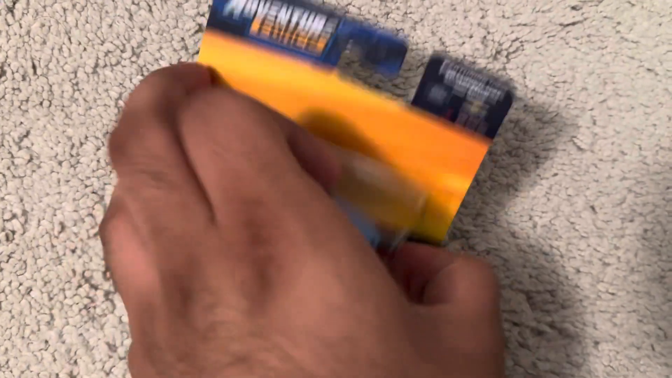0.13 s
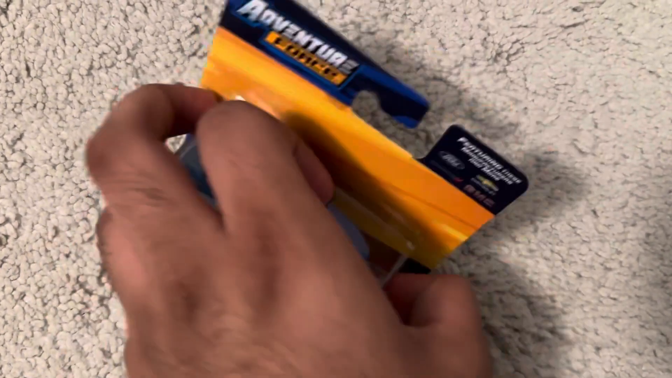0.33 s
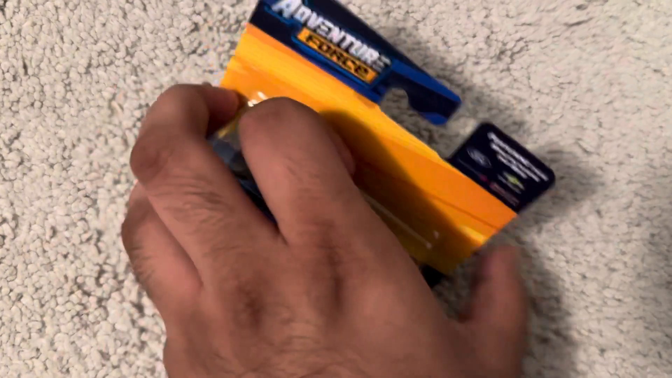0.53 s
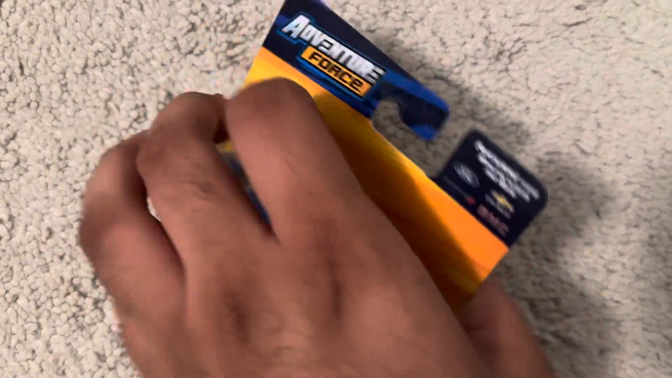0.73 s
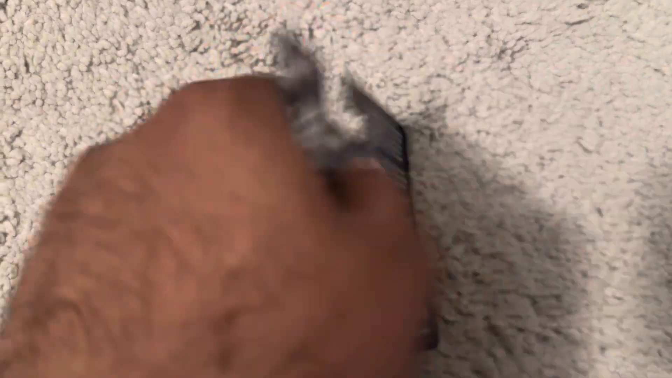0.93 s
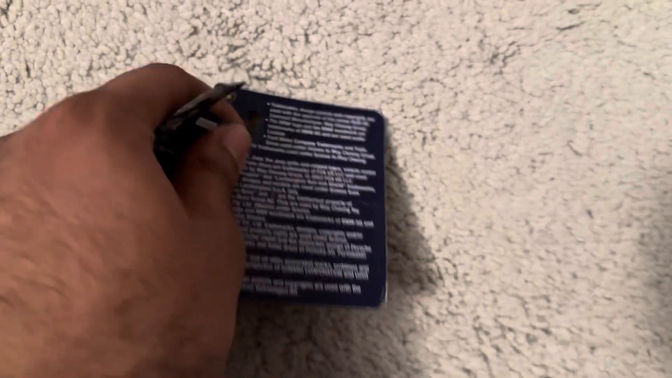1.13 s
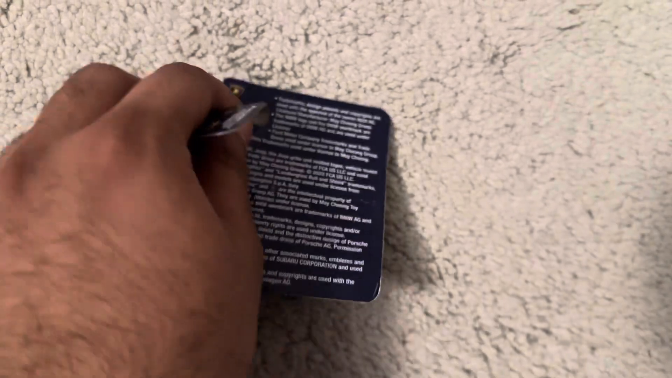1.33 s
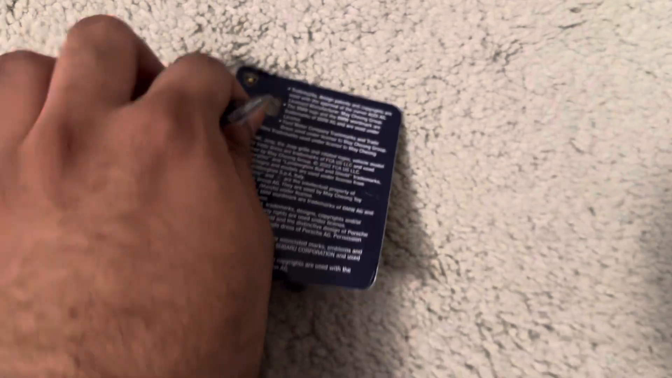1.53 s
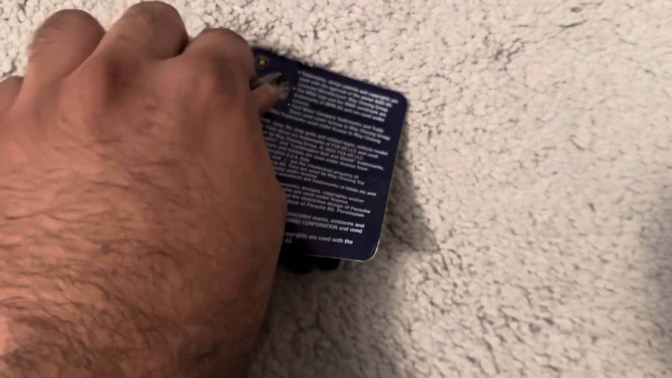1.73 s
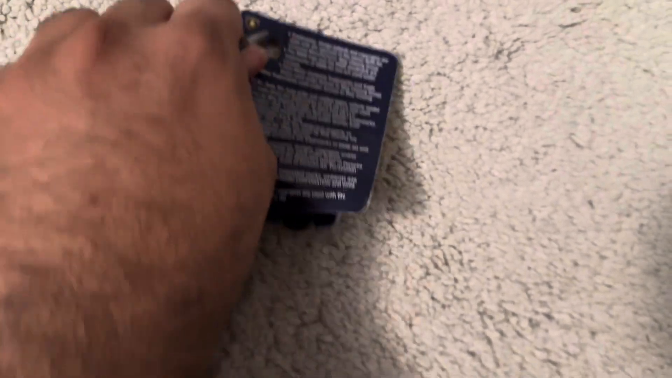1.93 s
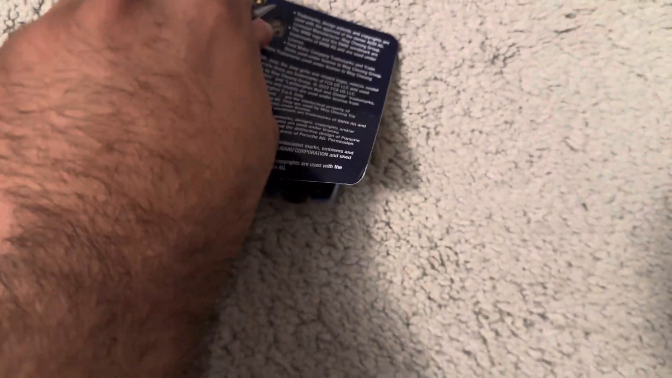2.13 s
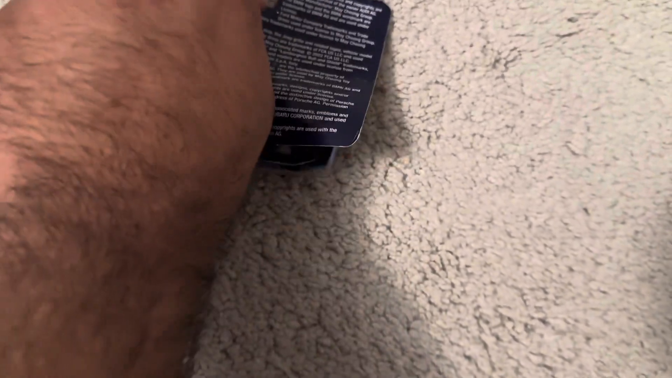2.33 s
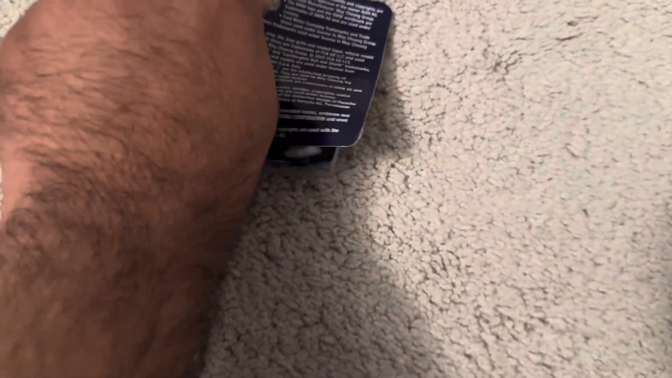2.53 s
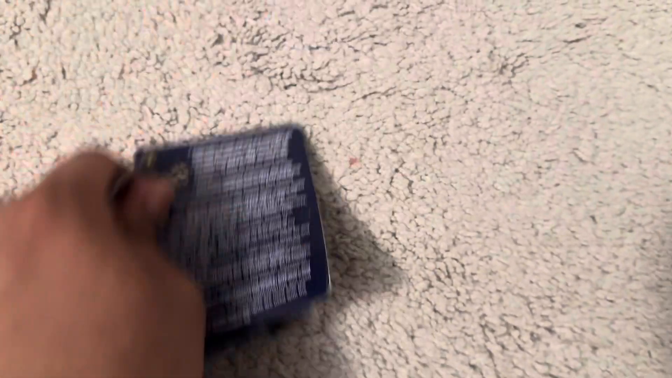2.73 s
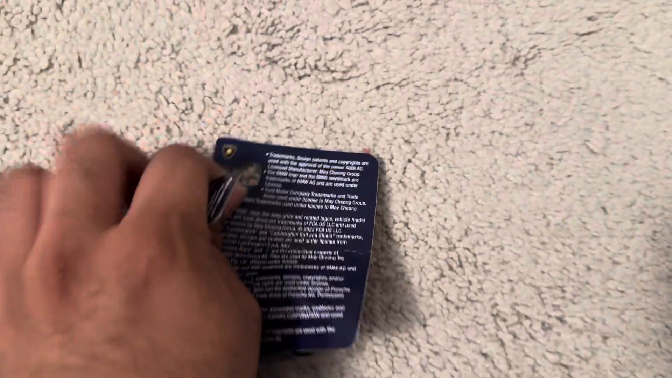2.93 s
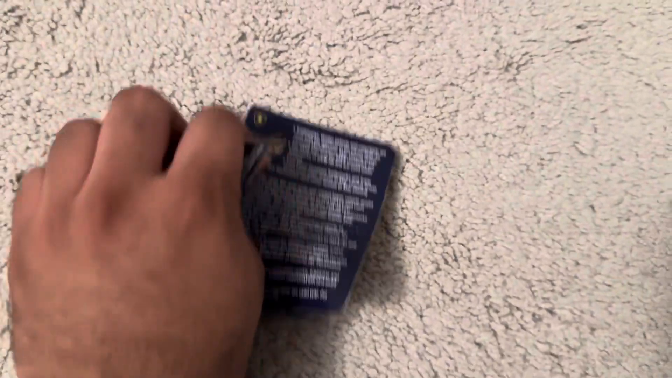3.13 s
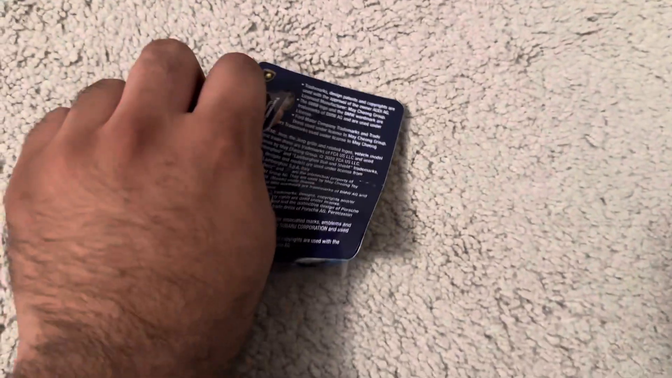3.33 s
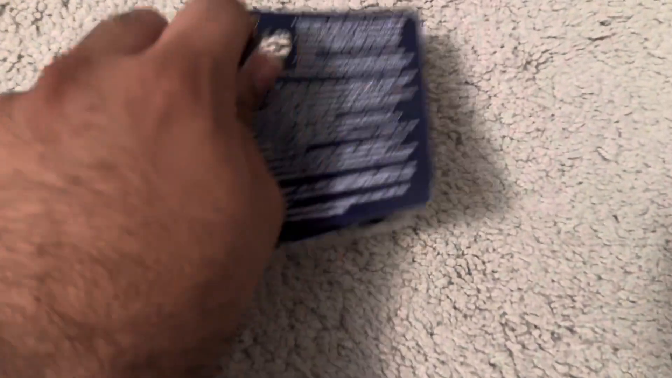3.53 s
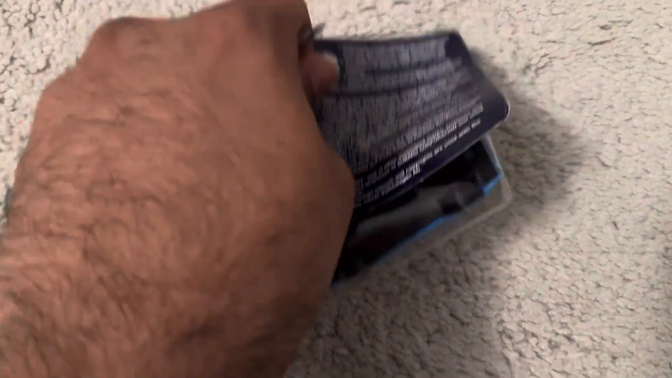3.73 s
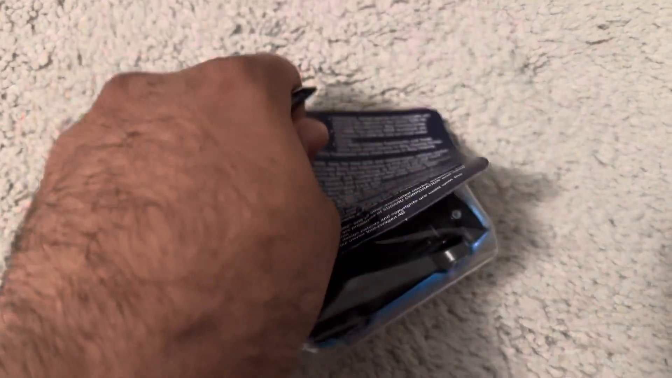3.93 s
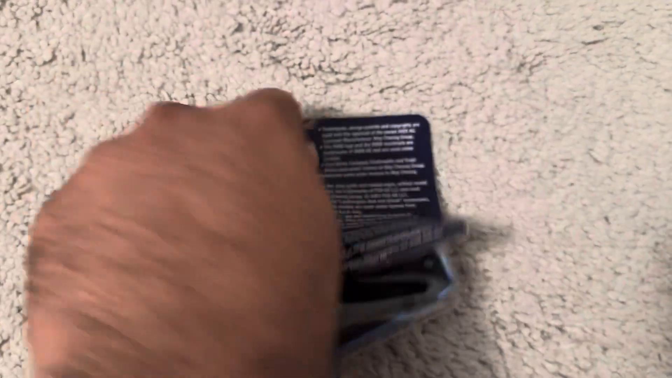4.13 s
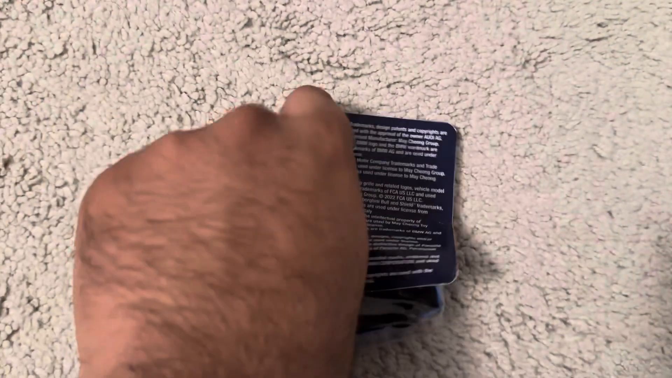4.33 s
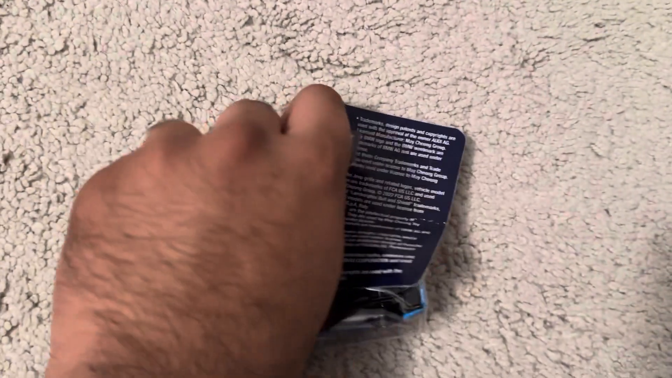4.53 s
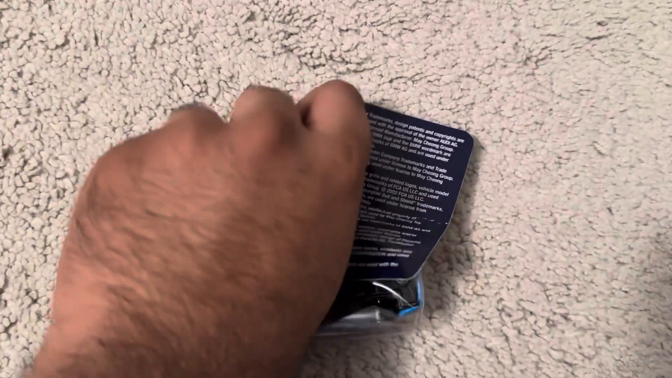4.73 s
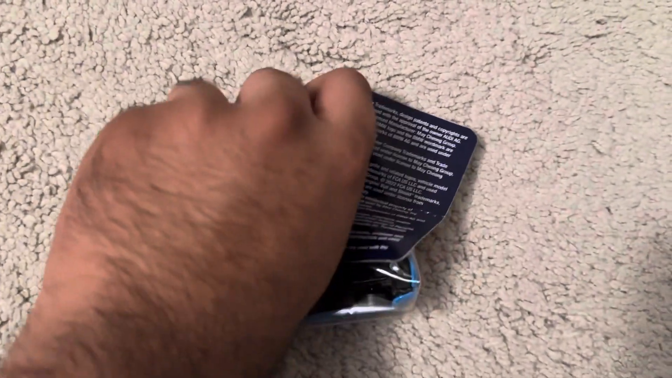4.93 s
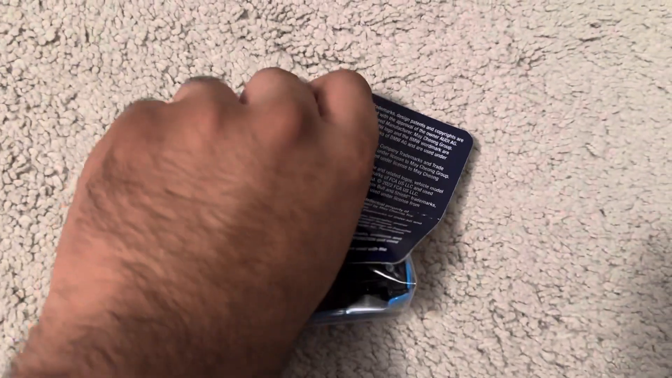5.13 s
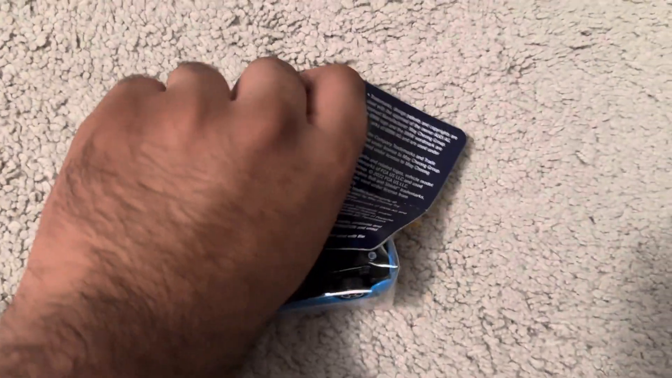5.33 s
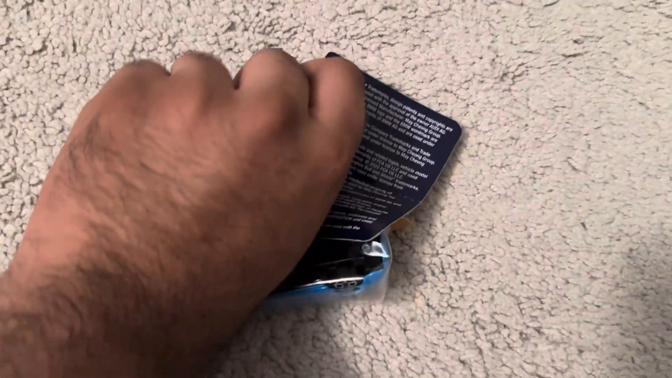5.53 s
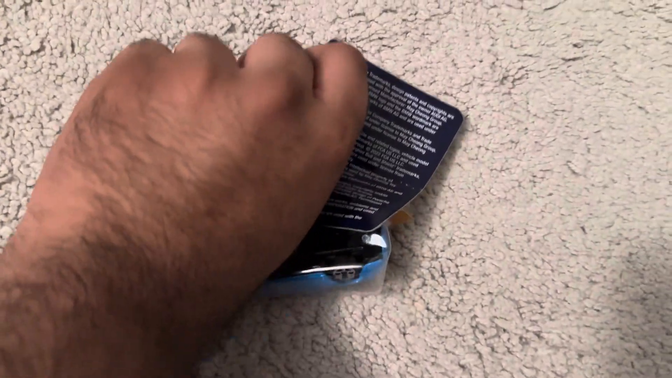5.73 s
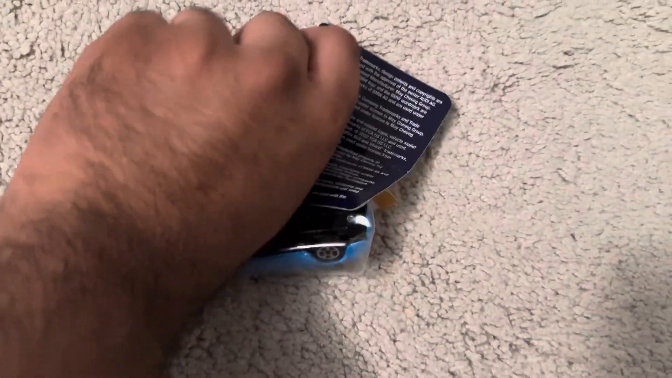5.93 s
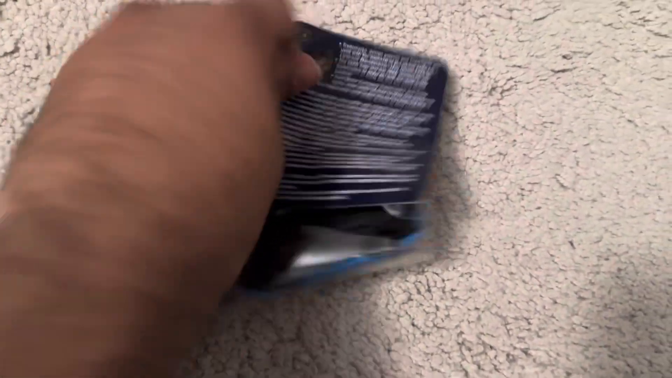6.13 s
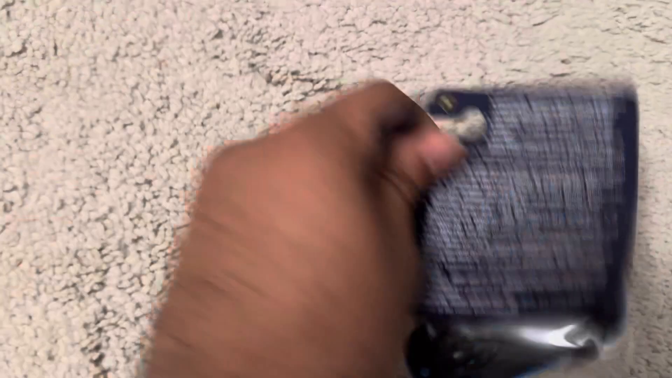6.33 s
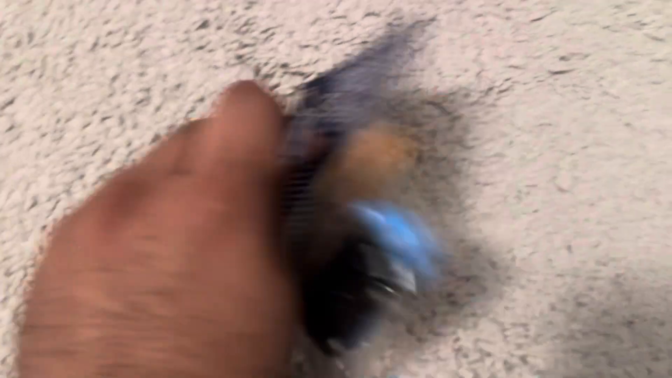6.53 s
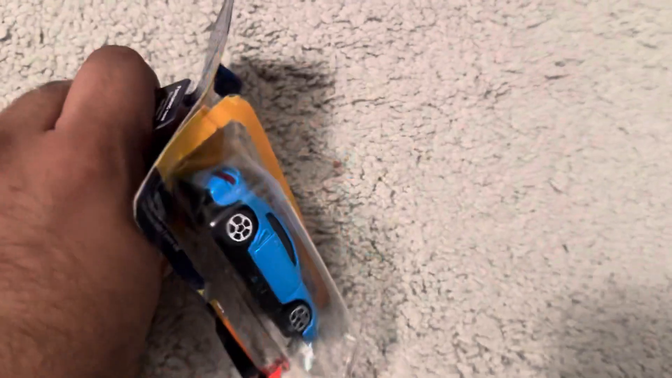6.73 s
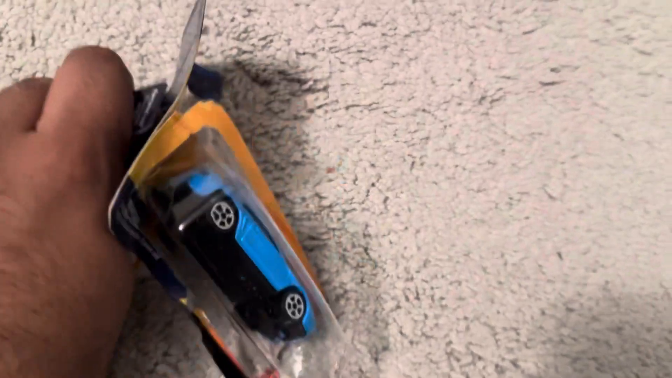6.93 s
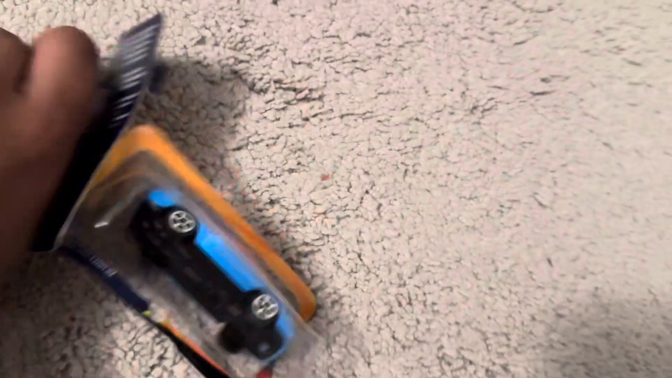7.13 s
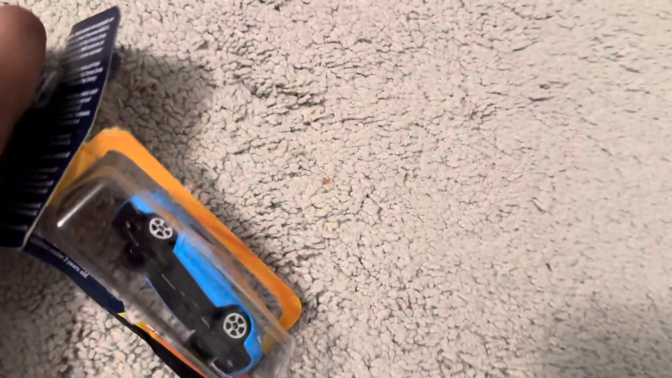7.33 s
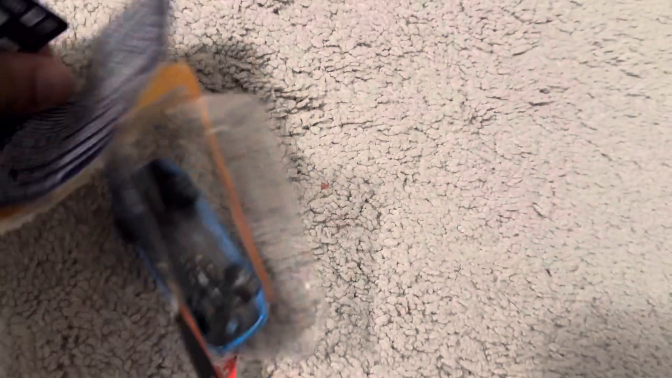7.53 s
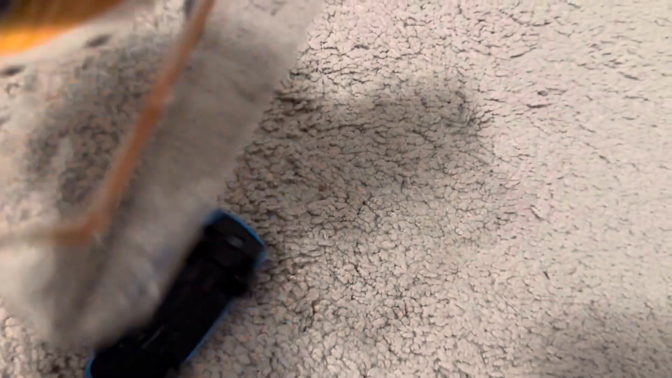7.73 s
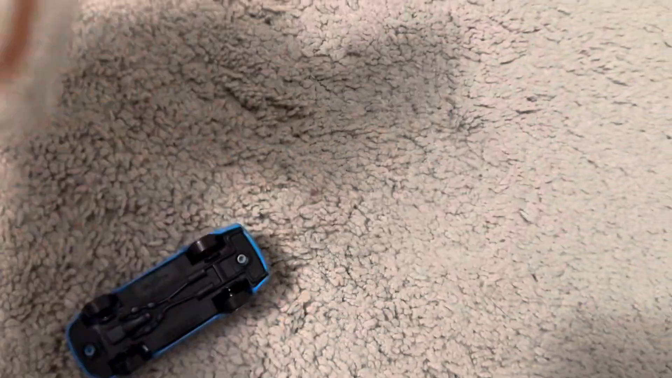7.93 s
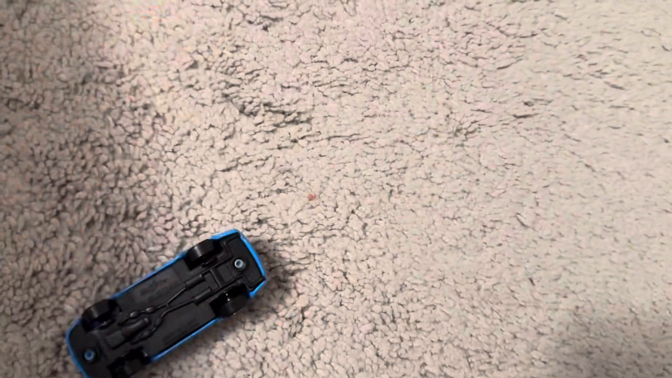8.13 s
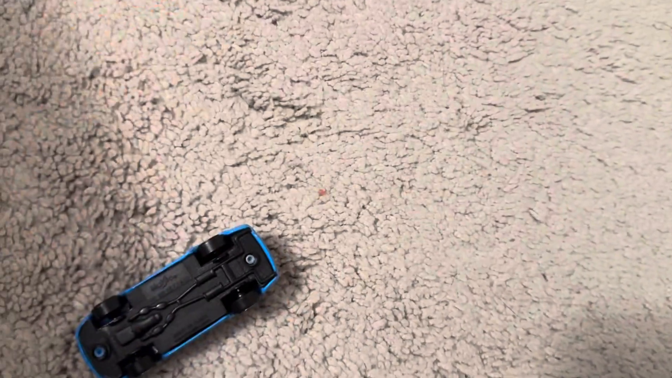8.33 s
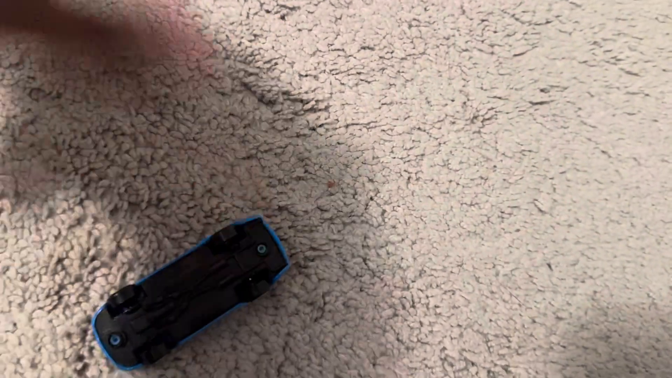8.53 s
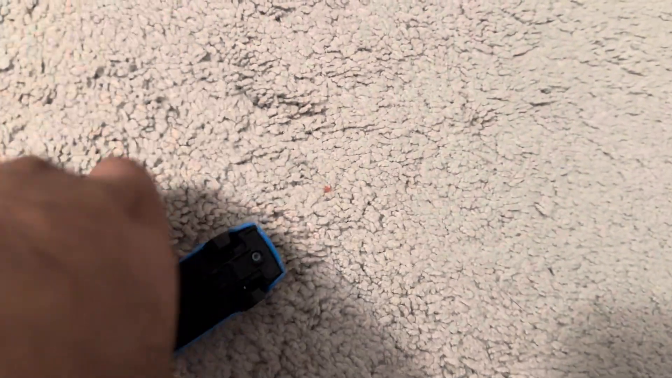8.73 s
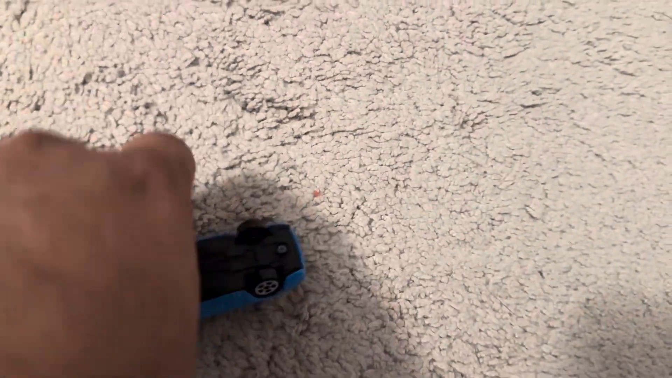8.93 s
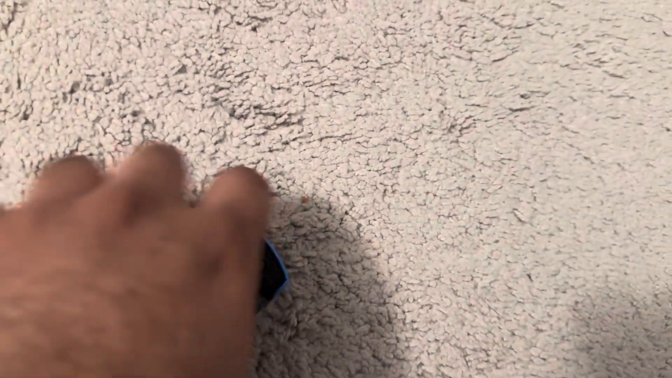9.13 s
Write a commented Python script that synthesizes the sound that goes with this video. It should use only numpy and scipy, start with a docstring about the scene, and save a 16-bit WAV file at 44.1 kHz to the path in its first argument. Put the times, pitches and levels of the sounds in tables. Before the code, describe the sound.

Sharp plastic snaps and crackles come unevenly, close to the microphone in a small room, as a blister pack is worked open by hand. Between them, skin hisses over card, the pack drags dully on carpet, and the backing gives short creaks and tears. The handling eases briefly, then peaks in a flurry of cracks. A toy car clicks out, the empty pack is set down, and the car's little wheels rattle in the hand.

```python
"""Opening a toy car's blister pack

Hands pry a cardboard and plastic pack open over a carpet, close by in a small room. Skin and pack rub,
the shell buckles in sharp snaps, the card flops, creaks and tears. A toy car slides out, the empty
pack is put aside, and the car's loose wheels rattle as it is picked up."""
import sys
import numpy as np
from scipy import signal
from scipy.fft import rfft, irfft
from scipy.io import wavfile
from scipy.ndimage import uniform_filter1d

SR = 44100
rng = np.random.default_rng(int(sys.argv[2]) if len(sys.argv) > 2 else 0)


def log_audio(samples):
    """Write samples as a 16-bit WAV file to the path given in sys.argv[1]."""
    # one column per channel
    frames = np.atleast_2d(samples).T
    # limit to full scale, then quantise
    limited = np.clip(frames, -1, 1)
    pcm = np.round(limited * 32767).astype(np.int16)
    wavfile.write(sys.argv[1], SR, pcm)


N = 409248


def amp(db):
    """Decibels to gain."""
    return 10 ** (np.asarray(db) / 20)


def unit_rms(x):
    """Scale to an rms of one."""
    return x / np.sqrt(np.mean(x ** 2) + 1e-20)


def lookup(points, hz):
    """Interpolate a table on a log-frequency axis."""
    f, value = np.transpose(points)
    return np.interp(np.log(hz + 1), np.log(f + 1), value)


def add(mix, start_s, sound):
    """Add a stereo sound into the mix."""
    part = mix[:, max(round(start_s * SR), 0):][:, :sound.shape[1]]
    part += sound[:, :part.shape[1]]


def bandpass(lo_hz, hi_hz, order=3):
    """Butterworth band-pass sections."""
    return signal.butter(order, [lo_hz, min(hi_hz, .49 * SR)], "band", fs=SR, output="sos")


def stereo_noise(n, corr):
    """White noise with a given left-right correlation."""
    a, b = rng.standard_normal((2, n))
    return np.array([a, corr * a + np.sqrt(1 - corr ** 2) * b])


def coloured(x, spectrum):
    """Give two independent signals a spectrum and correlate them, most in the bass."""
    # left-right likeness: f/Hz, correlation
    likeness = [(50, 0.87), (300, 0.82), (1000, 0.39), (4000, 0.32), (12000, 0.68)]
    hz = np.fft.rfftfreq(N, 1 / SR)
    a, b = rfft(x)
    corr = lookup(likeness, hz)
    stereo = np.array([a, corr * a + np.sqrt(1 - corr ** 2) * b])
    return unit_rms(irfft(stereo * amp(lookup(spectrum, hz)), N))


def wander(knots_per_s):
    """Random curve of about unit size."""
    knots = rng.standard_normal(4096)
    return np.interp(np.arange(N) / SR * knots_per_s, np.arange(len(knots)), knots)


def hand_effort(grip_db=(-64, -61.5), edge_s=0.054, swell_db=3.5):
    """Drag and slide levels in dB: soft-edged, swelling strokes on top of a steady grip."""
    # hand moves: t/s, length/s, pack drag level/dB, skin slide level/dB
    strokes = [(0.0, 0.082, -40, -46), (0.091, .2, -44, -57), (0.591, 0.19, -46.5, -55),
               (0.724, .18, -38.5, -45.5), (0.894, 0.31, -53.5, -48), (1.313, 0.12, -46, -54.5),
               (1.444, 0.099, -54.5, -53), (1.765, 0.21, -46.5, -53), (2.463, .35, -51.5, -50.5),
               (2.767, .4, -54, -51), (3.517, 0.25, -60.5, -49), (3.712, 0.26, -51.5, -49),
               (4.177, 0.36, -57.5, -62.5), (5.162, 0.28, -61.5, -52.5), (5.329, 0.69, -60.5, -55),
               (6.082, 0.25, -42, -47.5), (6.31, 0.19, -42, -44.5), (6.468, 0.22, -40.5, -37),
               (6.694, 0.31, -55, -60), (6.937, 0.302, -49, -49.5), (7.462, 0.24, -47, -54),
               (8.0, 0.15, -61.5, -52.5), (8.149, 0.27, -59.5, -63)]
    release_db = np.interp(np.arange(N) / SR, (7.7, 8.4), [0, -11])  # pack put aside
    power = amp(np.array(grip_db)[:, None] + release_db) ** 2
    for start_s, length_s, *levels_db in strokes:
        t = np.arange(0, length_s, 1 / SR)
        fade = np.sin(np.pi / 2 * np.clip(np.minimum(t, length_s - t) / edge_s, 0, 1)) ** 2
        force_db = np.array(levels_db)[:, None] + swell_db * (t / length_s - 1) + 0.5
        add(power, start_s, (fade * amp(force_db)) ** 2)
    return 10 * np.log10(power)


def shifting_contact(x, depth_db):
    """The contact moves, so resonances a few hundred Hz wide come and go."""
    spectra = signal.stft(x, nperseg=512)[2]
    patches = uniform_filter1d(rng.standard_normal(spectra.shape[1:]), size=6, axis=0)
    patches = unit_rms(uniform_filter1d(patches, size=7, axis=1))
    gain = amp(depth_db * 2 * np.tanh(patches / 2))
    return unit_rms(signal.istft(spectra * gain, nperseg=512)[1][:, :N])


def friction(level_db, spectrum, catches_per_s, hiss, flutter_db, patch_db, spread_db=3):
    """Tiny uneven catches over a smooth hiss; a harder rub is grittier."""
    sizes = amp(spread_db * np.minimum(rng.exponential(1, N), 4))
    sizes *= rng.random(N) < catches_per_s / SR
    catches = unit_rms(sizes * rng.standard_normal((2, N)))
    grit = amp(0.2 * (level_db - np.median(level_db)))
    contact = (grit * catches + hiss * rng.standard_normal((2, N))) / np.hypot(grit, hiss)
    pressure_db = flutter_db * np.tanh(wander(knots_per_s=45))
    return shifting_contact(coloured(contact, spectrum), patch_db) * amp(level_db + pressure_db)


def rubbing(drag_db, slide_db):
    """The pack drags dully on the pile; fingers hiss over the card."""
    # pack-on-carpet spectrum: f/Hz, level/dB
    drag_spectrum = [(25, -44), (60, -20.5), (150, 2), (240, 0), (360, 8.5), (500, -4), (900, 5.5),
                     (1500, -13), (2500, -9), (6000, -56)]
    # skin-on-card spectrum: f/Hz, level/dB
    slide_spectrum = [(500, -2), (1500, 5), (2500, 3), (5000, 0.5), (7300, 0.5), (8700, 1), (9600, 1.5),
                      (11000, -48), (14000, -3), (16000, -13)]
    drag = friction(drag_db + 1.5, drag_spectrum, catches_per_s=400, hiss=.9, flutter_db=5.5, patch_db=7)
    slide = friction(slide_db + 2, slide_spectrum, catches_per_s=1400, hiss=1.3,
                     flutter_db=6.5, patch_db=2)
    return (drag + slide) * amp([[1], [-1]])


def crinkles(slide_db, per_s=30, above_slide_db=9, spread_db=3.5, decay_s=.0009):
    """Fibres and small creases crack at random, louder under harder rubbing."""
    out, t = np.zeros((2, N)), np.arange(512) / SR
    creases = [bandpass(hz / 2, min(hz * 2, 8500)) for hz in (1500, 2200, 3200, 4600)]
    for when, which, size in rng.random((int(per_s * N / SR), 3)):
        burst = stereo_noise(len(t), corr=0.71) * np.exp(-t / decay_s)
        tick = signal.sosfilt(creases[int(which * len(creases))], burst)
        peak_db = slide_db[int(when * N)] + above_slide_db + spread_db * min(-np.log(1 - size), 3)
        add(out, when * N / SR, amp(peak_db) * tick / abs(tick).max())
    return out


def band_levels(bass_db, body_db, bright_db):
    """Relative dB of a sheet's four bands; brightness moves the upper two, the top one more."""
    return np.array([bass_db, body_db, 0.5 + 0.89 * bright_db, -2 + 1.11 * bright_db])


def sheet(blows, span_s, bands_db, air_db, panel_hz, panel_db, t60_s, low_ring, top_ring, panel_ring):
    """Blows ring a bent sheet: dense random modes and one panel mode. The ring factors scale t60_s."""
    # dense-mode bands: low f/Hz, high f/Hz
    bands_hz = [(300, 700), (700, 2400), (2400, 5500), (5500, 9600)]
    t = np.arange(3072) / SR

    def struck(modes, ring):
        return signal.fftconvolve(modes * amp(-60 * t / (t60_s * ring)), blows[None], axes=1)

    def at_level(x, db):  # energy of span_s at this rms level
        return x * amp(db) * np.sqrt(span_s * SR) / np.linalg.norm(x, axis=1, keepdims=True)

    def dense_modes(edges_hz, db, ring, corr):
        ringing = struck(stereo_noise(len(t), corr), ring)
        return at_level(signal.sosfilt(bandpass(*edges_hz), ringing), db)

    rings = np.geomspace(low_ring, top_ring, len(bands_hz))
    corrs = [0.82, 0.39, 0.47, 0.13]
    out = sum(dense_modes(*band) for band in zip(bands_hz, bands_db, rings, corrs))
    # sharper breaks spill more into the highest treble
    spill_db = bands_db[-1] + air_db + np.clip(bands_db[-1] + 20, -20, 0) / 2
    out += dense_modes((9600, 16000), spill_db, top_ring, corr=0.15)
    lag_rad = np.array([[0], [min(panel_hz / 1100, 1)]])  # right channel trails
    gripped_ring = min(panel_ring, 20 / (panel_hz * t60_s))  # the hand stops it within 20 cycles
    out += at_level(struck(np.sin(2 * np.pi * panel_hz * t - lag_rad), gripped_ring), panel_db)
    return out * amp([[1.8], [-1.8]])


def shell_snaps(give_s=.0015, give_db=-11):
    """The plastic shell gives a little, then buckles in one blow."""
    # buckles and knocks: t/s, nominal t60/s, level/dB, bass/dB, brightness/dB, panel f/Hz
    snaps = [(0.1025, .028, -30.5, -2, -17, 750), (0.112, 0.039, -32, -1.5, 0, 1136),
             (0.122, 0.091, -31, -3.5, -3, 900), (0.183, 0.028, -40.5, -18, -6, 1010),
             (0.2422, .031, -40, 1, 1.5, 449), (0.282, 0.028, -37.5, -5, 2.5, 7800),
             (0.3784, 0.03, -34, -3, 0.5, 1010), (0.4592, 0.031, -32.5, 0, -9.5, 421),
             (0.683, 0.18, -38.5, -11, -17, 980), (0.835, 0.016, -40.5, 3.5, -17, 2470),
             (0.9, 0.038, -25, -4.5, -4.5, 2170), (0.9842, 0.031, -34, -3.5, -12, 2880),
             (1.0176, 0.098, -19.5, -5, -7.5, 860), (1.021, .017, -18, -1, -8.5, 954),
             (1.2692, 0.011, -22, -36, -3.5, 2200), (1.296, 0.027, -32, -12.5, -2, 2300),
             (1.353, 0.015, -38, -17, -12.5, 2220), (1.557, 0.023, -29, -3, 1.5, 620),
             (1.5957, 0.016, -22.5, -7.5, 1, 4860), (1.827, 0.017, -36.5, -4, -7, 2660),
             (1.8989, 0.019, -26.5, -7, 5.5, 6900), (1.9371, 0.045, -28, -17.5, -13, 1800),
             (2.1084, .017, -16.5, -15.5, -7.5, 1470), (2.1767, 0.013, -24, -33, -15.5, 970),
             (2.196, 0.027, -28.5, -8, -4, 1090), (2.4805, 0.024, -18.5, -6, -13, 1020),
             (2.2904, 0.014, -43, -9, -11.5, 850), (2.5338, 0.014, -18.5, -28, -8.5, 1270),
             (2.5541, 0.011, -29.5, -19.5, 0.5, 1130), (2.6318, 0.014, -22, -22, -28.5, 1086),
             (2.836, 0.018, -30.5, 2, -26, 770), (2.9364, 0.068, -33.5, -11, -8, 880),
             (2.9583, 0.025, -35.5, -13.5, -11.5, 1370), (2.9941, 0.0091, -19, -41, -3, 1704),
             (3.129, .021, -45, -11, -8.5, 3410), (3.1857, 0.17, -36, -8, -2.5, 3730),
             (3.216, 0.018, -15, -17.5, -7.5, 3400), (3.3573, 0.029, -39, -9.5, -1, 930),
             (3.4381, 0.0098, -32.5, -5.5, 5.5, 4330), (3.4405, 0.019, -13.5, -10.5, -4.5, 976),
             (3.676, 0.035, -48, -19.5, 6.5, 4470), (3.7243, 0.016, -27.5, -14, 0, 4500),
             (3.7708, .029, -15, -9.5, -11.5, 1740), (3.7765, 0.016, -14.5, -4.5, -1, 1100),
             (3.973, 0.023, -44, 0, -21, 480), (4.1154, 0.019, -15.5, -18, -0.5, 1930),
             (4.4711, 0.013, -18.5, -11, -11, 1470), (4.4742, 0.017, -18.5, -10, -6, 960),
             (4.491, .02, -31, 1, -2, 420), (4.8487, 0.012, -19.5, -6.5, 0.5, 3580),
             (5.2933, 0.043, -42, -14, 0, 8800), (5.9759, 0.024, -38, -5.5, -5.5, 990),
             (6.0844, .012, -20.5, -4, -11, 8100), (6.1219, .019, -18, -13.5, -6, 7160),
             (6.1957, 0.035, -14, -12.5, -3.5, 990), (6.2396, 0.03, -12, -12, -3.5, 1710),
             (6.2657, 0.032, -30, 0, -14, 810), (6.357, 0.012, -22, -19.5, -7.5, 3540),
             (6.3634, 0.033, -27.5, -4.5, -5.5, 950), (6.382, 0.022, -13.5, -8, -10.5, 1970),
             (6.404, 0.011, -27, -3, -4.5, 1200), (6.4806, 0.017, -44.5, 6, 13, 1890),
             (6.5552, 0.069, -22.5, 0, -0.5, 1120), (6.5901, 0.016, -17, -23, -3.5, 1670),
             (6.7658, 0.019, -45.5, -8, -18, 1610), (7.5306, .063, -44, -9, -5, 370),
             (7.5729, 0.035, -32, -17, -8.5, 680), (7.632, 0.044, -37, -13, 0.5, 1740),
             (8.0738, 0.014, -41, -5, 5.5, 6300), (8.0945, .022, -48, 5, 11, 7140),
             (8.218, .06, -34, -10.5, -9, 1580)]
    out = np.zeros((2, N))
    blows = np.r_[amp(give_db), np.zeros(int(give_s * SR)), 1]
    for at_s, t60_s, level_db, bass_db, bright_db, panel_hz in snaps:
        bands_db = level_db + band_levels(bass_db, body_db=-1.5, bright_db=bright_db)
        snap = sheet(blows, span_s=.005, bands_db=bands_db, air_db=-9,
                     panel_hz=panel_hz, panel_db=level_db - 2.2,
                     t60_s=t60_s, low_ring=0.92, top_ring=0.44, panel_ring=3.5)
        add(out, at_s - give_s, snap)
    return out


def thuds(events, swell_s, band_hz):
    """Soft pushes of low noise, with no ring."""
    out, t = np.zeros((2, N)), np.arange(8000) / SR
    envelope = t * np.exp(-t / swell_s)
    for at_s, peak_db in events:
        push = signal.sosfilt(bandpass(*band_hz), stereo_noise(len(t), corr=0.92) * envelope)
        add(out, at_s, amp(peak_db) * push / abs(push).max())
    return out


def carpet_bumps():
    """The padded floor takes the weight of hand and pack."""
    # floor contacts: t/s, level/dB
    bumps = [(0.104, -45), (1.02, -43), (1.396, -46.5), (2.49, -33), (2.718, -39.5), (2.827, -43),
             (2.931, -44), (3.46, -41.5), (3.717, -42.5), (4.048, -35), (4.468, -36.5), (5.018, -57),
             (6.377, -40.5), (6.586, -39), (7.608, -42), (8.078, -43)]
    return amp(1) * thuds(bumps, swell_s=0.016, band_hz=(41, 115.4))


def card_flops():
    """The whole card gives way and pushes the air."""
    # card flopping or pressed flat: t/s, level/dB
    flops = [(0.108, -27.5), (0.784, -28), (0.907, -29.5), (1.018, -24), (4.475, -37), (6.271, -29.5),
             (6.381, -24.5), (6.556, -24.5), (7.581, -26), (8.073, -35), (8.219, -32.5), (8.357, -39)]
    return amp(-2) * thuds(flops, swell_s=0.005, band_hz=(146, 302.4))


def card_rips(slips_per_s=320, jitter=.5, uneven_db=4, fade_db=5):
    """Fibres stick and slip in a quick, uneven, fading run."""
    # creaks, tears and scrapes: t/s, length/s, level/dB, brightness/dB, panel f/Hz
    rips = [(0.112, 0.041, -37.5, -14, 1010), (0.374, 0.018, -39.5, -28, 970),
            (0.902, 0.067, -36, -1, 1800), (1.042, 0.033, -30, -1.5, 940), (1.384, 0.012, -35.5, -10, 900),
            (2.178, 0.026, -32, -11, 1180), (2.553, 0.016, -34, -15, 940), (3.569, 0.042, -37, -17.5, 1930),
            (3.779, 0.014, -23.5, -14.5, 1260), (4.285, 0.029, -36.5, -20, 790),
            (4.411, 0.0073, -36.5, -13, 870), (4.492, 0.011, -23.5, -12, 350), (4.66, 0.044, -47, -26, 736),
            (5.253, 0.064, -44.5, -5, 8700), (6.375, .01, -34.5, -6.5, 3330),
            (6.389, 0.012, -25.5, -18, 1430), (6.558, 0.022, -23.5, -36, 860),
            (6.594, .036, -39.5, -9, 1900), (7.533, 0.014, -34.5, -5, 363), (7.565, 0.021, -32, -1, 373),
            (8.073, 0.03, -38.5, -10.5, 7000), (8.591, 0.022, -56, -25, 890)]
    out = np.zeros((2, N))
    for start_s, length_s, level_db, bright_db, panel_hz in rips:
        gaps, sizes = rng.standard_normal((2, 64))
        slips_s = np.r_[0, np.cumsum(np.exp(jitter * gaps[1:]))] / slips_per_s
        slips_db = uneven_db * sizes - fade_db * slips_s / length_s
        inside = slips_s <= length_s
        blows = np.zeros(int(length_s * SR) + 1)
        blows[(slips_s[inside] * SR).astype(int)] = amp(slips_db[inside])
        bands_db = level_db + band_levels(bass_db=-11, body_db=-4.5, bright_db=bright_db)
        rip = sheet(blows, length_s, bands_db, air_db=-8.5, panel_hz=panel_hz, panel_db=level_db + 3.6,
                    t60_s=0.019, low_ring=1.9, top_ring=1.0, panel_ring=3.1)
        add(out, start_s, rip)
    return amp(-5.5) * out


def wheel_click(damping=2.3, detune=0.046, chatter_db=10, chatter_s=0.0047, attack_s=0.0016):
    """A wheel chatters and rings the car's body, damped by pile and fingers."""
    # body modes: f/Hz, level/dB, t60/s before damping
    body_modes = [(1383, -13.5, 0.2), (2750, -8.5, 0.1), (3350, -2, 0.11), (3880, -14, 0.047),
                  (4350, -6.5, 0.14), (5130, -1, 0.11), (5710, -5.5, 0.034), (6410, 2.5, 0.052),
                  (6510, -3, 0.13), (8620, -4.5, 0.044), (8550, -39, 0.075), (8860, -8.5, 0.16)]
    hz, level_db, t60_s = np.transpose(body_modes)[:, :, None]
    t = np.arange(4000) / SR
    # each contact lands elsewhere, so the modes shift
    shift, strength_db = rng.standard_normal((2, len(hz), 1))
    cycles = hz * (1 + detune * shift) * t + rng.random((len(hz), 1))
    cycles = cycles + 0.37 * rng.random((2, len(hz), 1))  # phase per channel
    envelopes = amp(level_db + strength_db - 60 * damping * t / t60_s)
    ring = (envelopes * np.sin(2 * np.pi * cycles)).sum(1)
    chatter = signal.sosfilt(bandpass(3630, 5900, order=1), stereo_noise(len(t), corr=0.059))
    chatter *= amp(chatter_db) * np.exp(-t / chatter_s)
    click = signal.sosfilt(bandpass(1360, 19000), ring + chatter) * (1 - np.exp(-t / attack_s))
    return click / abs(click).max()


def car_rattle(bounce_s=0.0031, bounce_db=-5):
    """Loose wheels bounce on their axles: a click, then four weaker ones."""
    # wheel contacts: t/s, level/dB
    rattles = [(7.728, -29), (7.7494, -38), (7.8232, -38), (7.846, -41), (8.7838, -20), (8.797, -47.5),
               (8.8187, -30), (8.8677, -38.5), (8.977, -38), (8.983, -28), (9.0203, -30.5), (9.059, -35),
               (9.14, -26.5), (9.1657, -28.5), (9.205, -32.5), (9.2424, -42.5)]
    out = np.zeros((2, N))
    for at_s, level_db in rattles:
        delays_s = np.r_[0, np.cumsum(bounce_s * rng.uniform(.5, 2, size=4))]
        for k, delay_s in enumerate(delays_s):
            add(out, at_s + delay_s, amp(level_db + k * bounce_db) * wheel_click())
    return amp(-1.5) * out * amp([[1], [-1]])


def room_reverb(x, echo_s=0.014, echo_width_s=0.0042, echo_db=-15, tail_db=-18.5, build_s=0.0097):
    """Early echoes off ceiling and walls, then a diffuse tail dying band by band."""
    # tail decay: f/Hz, t60/s
    decay = [(150, 0.21), (500, 0.25), (1300, 0.37), (4000, 0.3), (9000, 0.42), (15000, 0.053)]
    # tail spectrum: f/Hz, level/dB
    colour = [(100, -7), (400, -1), (1000, 3.5), (1350, 3.5), (1750, 0.5), (2500, 0), (5000, 1.5),
              (9000, -4), (11000, -15), (15000, 2)]
    t = np.arange(int(.7 * SR)) / SR
    hz, frame_s, spectra = signal.stft(rng.standard_normal((2, len(t))), SR, nperseg=256)
    spectra *= amp(lookup(colour, hz)[:, None] - 60 * frame_s / lookup(decay, hz)[:, None])
    tail = signal.istft(spectra, SR, nperseg=256)[1][:, :len(t)]
    tail *= 1 - np.exp(-(t / build_s) ** 2)
    echoes = rng.standard_normal((2, len(t))) * np.exp(-.5 * ((t - echo_s) / echo_width_s) ** 2)
    echoes = signal.sosfilt(bandpass(680, 8700, order=5), echoes / np.linalg.norm(echoes[0]))
    response = amp(tail_db) * tail / np.linalg.norm(tail[0]) + amp(echo_db) * echoes
    return signal.fftconvolve(x, response, axes=1)[:, :N]


def room_hush(level_db=-56.5):
    """Faint, steady low noise of the quiet room."""
    # background spectrum: f/Hz, level/dB
    spectrum = [(20, -27), (35, -6), (58, 2.5), (100, -4), (170, -7), (260, -5), (350, -8), (450, -13),
                (700, -17.5), (1300, -30), (3000, -24), (9000, -42.5), (11000, -62), (16000, -53.5)]
    return amp(level_db) * coloured(rng.standard_normal((2, N)), spectrum)


def scene():
    """Close handling, its reverberation and the room's hush."""
    drag_db, slide_db = hand_effort()
    direct = shell_snaps() + card_rips() + crinkles(slide_db) + car_rattle()
    direct += carpet_bumps() + card_flops() + rubbing(drag_db, slide_db)
    return direct + room_reverb(direct) + room_hush()


def record(dry, ceiling=1.1, cutoff_hz=16300):
    """Soft clipping, microphone colour, low-pass."""
    # response: the deepest bass cut away, and the microphone's treble notch: f/Hz, gain/dB
    microphone = [(20, -13.5), (36, -4), (60, -1), (4500, 0), (6800, -1.5), (8600, 2), (9500, -0.5),
                  (10300, -6.5), (11400, -19.5), (12600, -0.5), (16000, -1.5)]
    rounded = ceiling * np.tanh(dry / ceiling)
    response = amp(lookup(microphone, np.fft.rfftfreq(N, 1 / SR)))
    heard = irfft(rfft(rounded) * response, N)
    lowpass = signal.firwin(255, cutoff_hz, window=("kaiser", 9), fs=SR)
    return signal.oaconvolve(heard, lowpass[None], "same")


dry = scene()
out = record(dry)
log_audio(out)
```